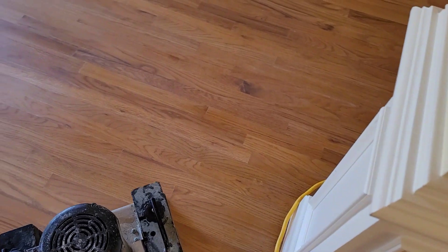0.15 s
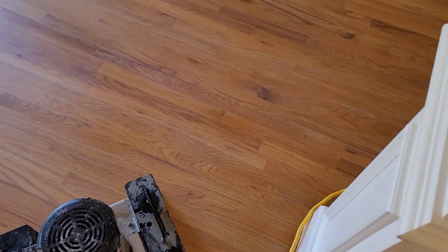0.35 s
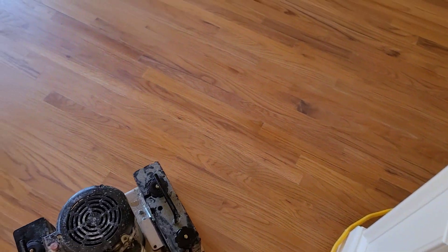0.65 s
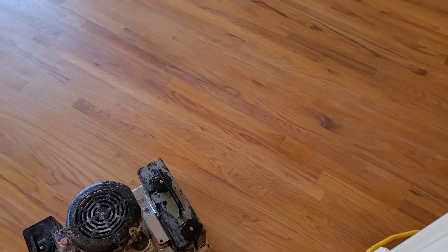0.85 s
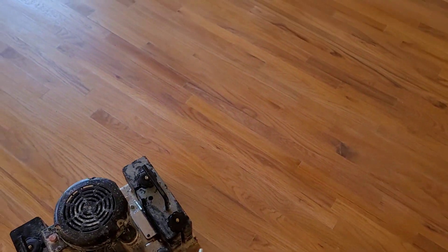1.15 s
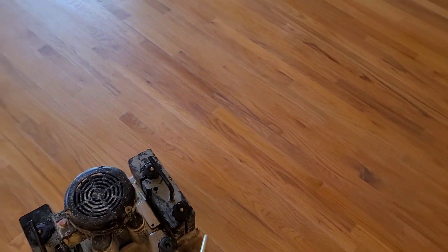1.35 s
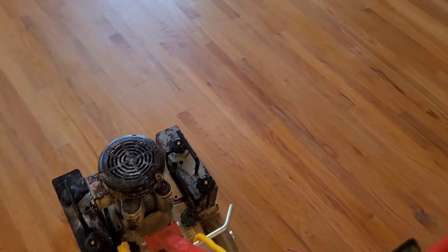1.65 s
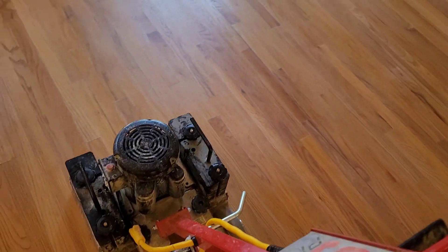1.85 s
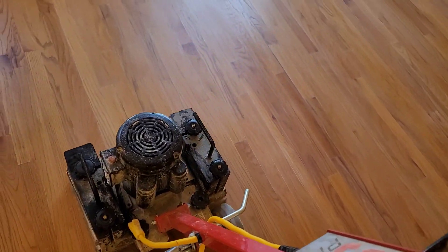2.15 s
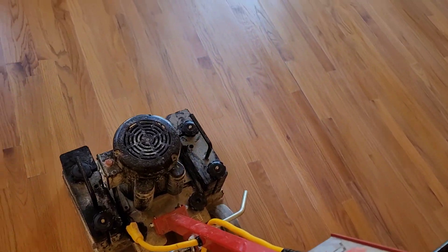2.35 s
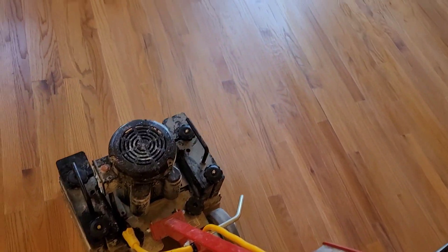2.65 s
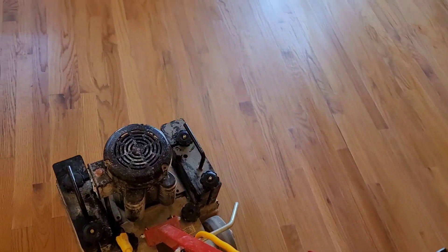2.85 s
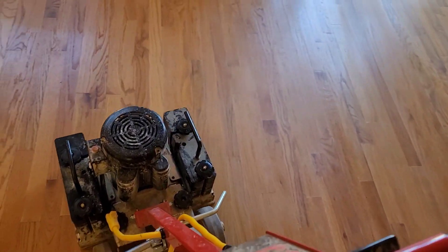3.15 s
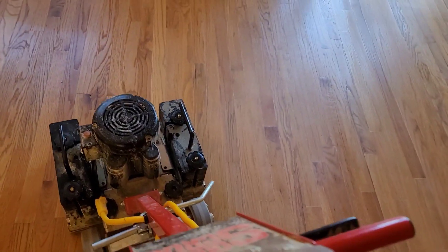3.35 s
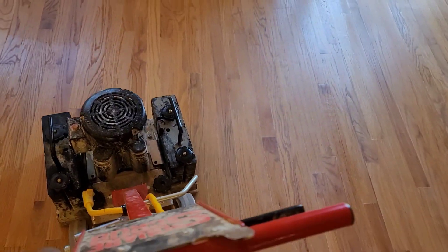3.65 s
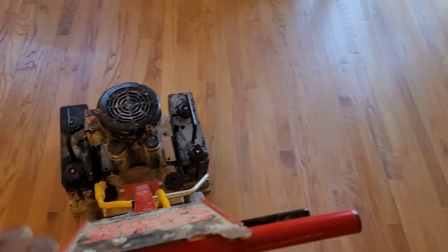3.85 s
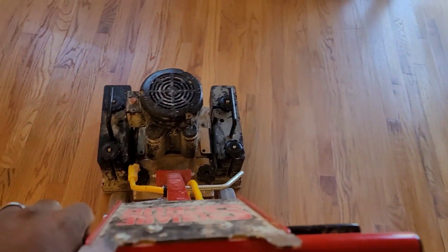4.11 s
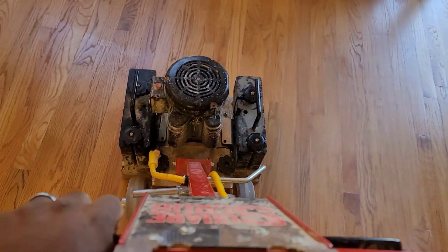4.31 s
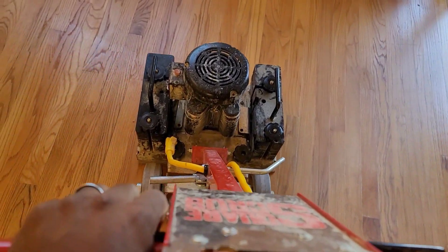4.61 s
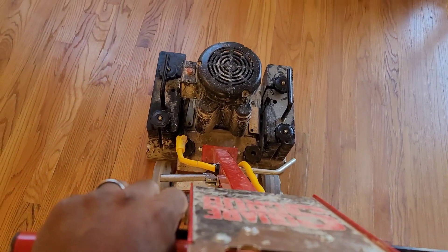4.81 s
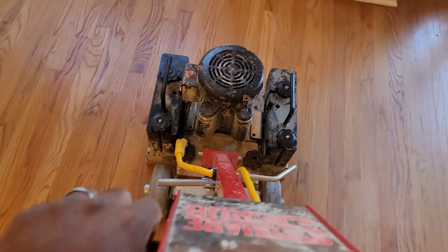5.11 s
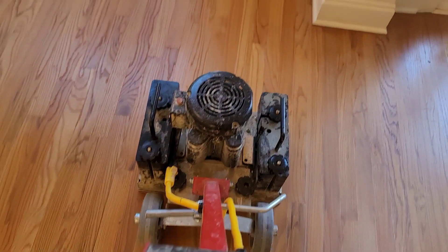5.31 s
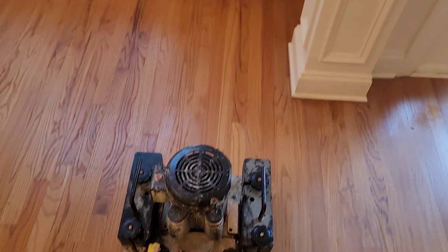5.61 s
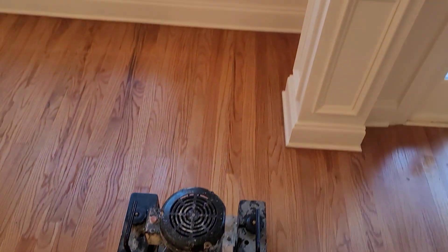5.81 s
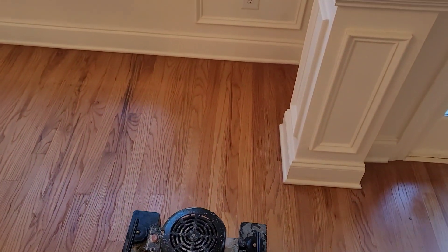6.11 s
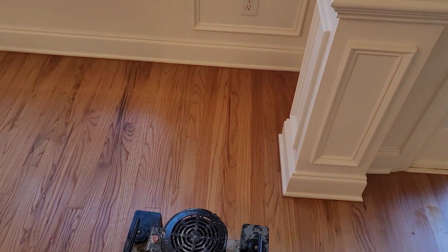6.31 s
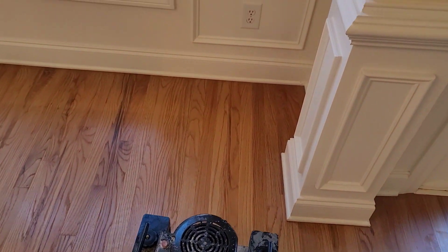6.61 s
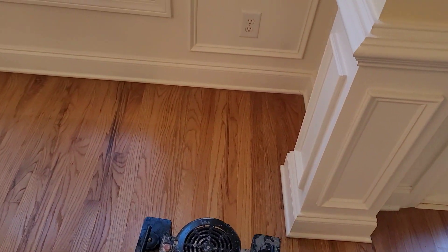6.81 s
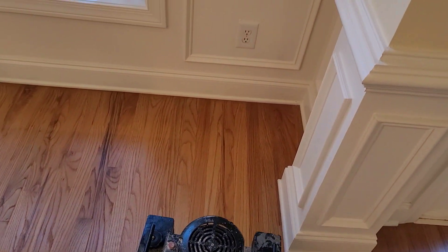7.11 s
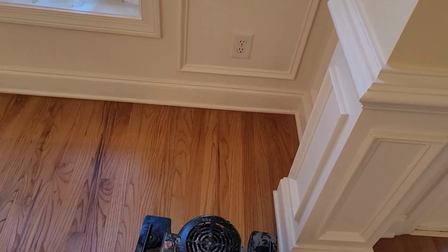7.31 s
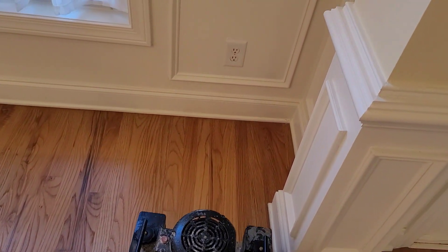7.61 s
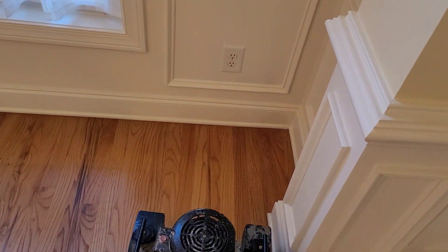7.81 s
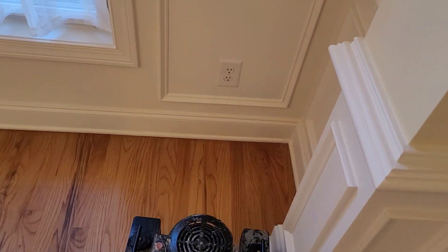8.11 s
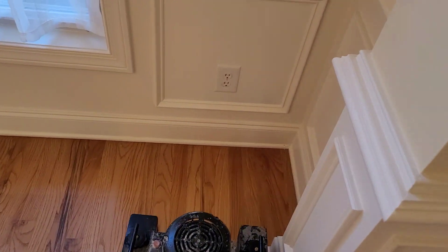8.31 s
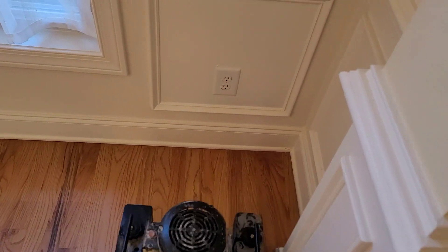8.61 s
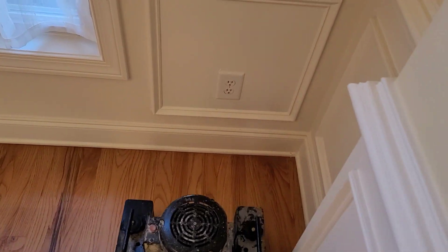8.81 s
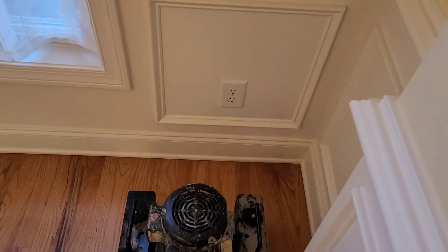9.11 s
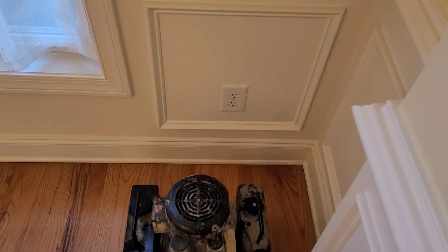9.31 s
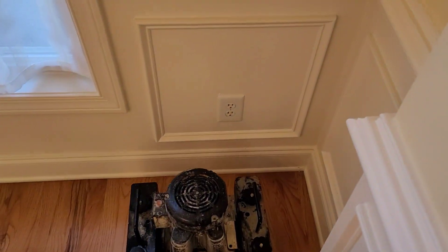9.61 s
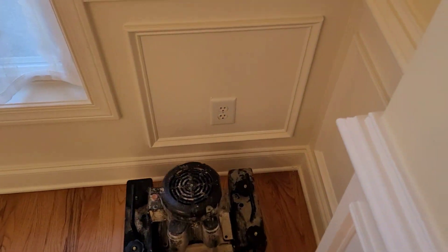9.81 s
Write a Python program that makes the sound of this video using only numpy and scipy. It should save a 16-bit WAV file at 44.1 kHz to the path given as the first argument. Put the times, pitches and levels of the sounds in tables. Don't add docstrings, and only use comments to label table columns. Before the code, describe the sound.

Heard from the handle in close stereo, a scrubbing machine keeps a constant motor drone and strong airy roar while gliding over hardwood. Thin whining tones fade in and out with the room's reflections, and the rubbing pad flickers with soft high hiss. Toward the wall and corner the sound thickens and brightens a little, with small dry scratches of grit; it never stops.

```python
import sys
import numpy as np
from scipy import signal
from scipy.io import wavfile
from scipy.ndimage import uniform_filter1d

SR = 44100
rng = np.random.default_rng(int(sys.argv[2]) if len(sys.argv) > 2 else 0)


def persist_wave(psi):
    counts = np.round(np.clip(psi, -1, 1) * 32767).astype(np.int16)
    wavfile.write(sys.argv[1], SR, np.atleast_2d(counts).T)


def undo_db(level):
    steps = np.asarray(level, float) / 20
    return 10 ** steps


N = 438794
SHAFT_HZ = 58.82


def evened(x):
    return x / np.sqrt(np.mean(abs(x) ** 2) + 1e-20)


def read(points, hz):
    f, *columns = np.transpose(points)
    return [np.interp(np.log(hz + 1), np.log(f + 1), c) for c in columns]


def follow(rows, t):
    s, *columns = np.transpose(rows)
    return [np.interp(t, s, c) for c in columns]


def wander(per_s, t, count):
    white = rng.standard_normal((count, 1024, 2)) @ [1, 1j]
    spectrum = white * np.exp(-(np.fft.fftfreq(1024, .01) / per_s) ** 2)
    slow = evened(np.fft.ifft(spectrum))
    return np.array([np.interp(t, np.arange(1024) / 100, row) for row in slow])


def bumps(rows, t, scale=float):
    return sum(scale(db) * np.exp(-.5 * ((t - s) / max(spread, .01)) ** 2) for s, db, spread in rows)


def crests(tables, t):
    trough_db = -63
    return np.array([undo_db(trough_db) + bumps(rows, t, undo_db) for rows in tables])


# (time [s], fan roar level [dB], first shroud resonance [Hz])
WALK = [(0, -32.5, 1460), (.4, -32, 1450), (.8, -32, 1530), (2.2, -31, 1570), (3.2, -31.5, 1505),
        (4.2, -31, 1504), (5.5, -30.5, 1490), (5.9, -30.5, 1510), (6.6, -30, 1440), (7.0, -30.5, 1520),
        (7.9, -30.5, 1530), (8.25, -28.5, 1530), (8.7, -29.5, 1515), (9.0, -28, 1500), (9.4, -29, 1500),
        (9.7, -28, 1440), (9.95, -28.5, 1430)]


def wall_gain(t):
    db = follow(WALK, t)[0]
    return db - db.mean()


def swells(ranges, echoes, t, hz, per_s):
    centre_hz, share, corner_db, chance_db = np.transpose(ranges)[:, :, None]
    corner_s, corner_rise_s = 9.48, 0.23
    corner = 1 / (1 + np.exp((corner_s - t) / corner_rise_s * 2))
    levels_db = share * wall_gain(t) + corner_db * corner + np.array([bumps(rows, t) for rows in echoes])
    levels_db += chance_db * wander(per_s, t, count=len(ranges)).real
    handover = np.array([np.interp(hz, centre_hz[:, 0], row) for row in np.eye(len(ranges))])
    return handover.T @ levels_db


def grid(size):
    hop = size // 4
    return (np.arange((N + 2 * size) // hop) * hop - size) / SR, np.fft.rfftfreq(size, 1 / SR)


def patches(t, hz, bins, frames):
    white = rng.standard_normal((len(t), len(hz))).T
    return evened(uniform_filter1d(uniform_filter1d(white, bins, 0), frames, 1))


# (frequency [Hz], likeness [0-1], left port's lead [rad])
PORTS = [(59, 1, 0.083), (120, 1, 0.49), (300, 0.65, 0.27), (413, 0.7, 0.59), (527, 0.06, 1.9),
         (660, 0.43, 1.5), (810, 0.17, 1.6), (1530, 0.38, 2.09), (2060, 0.57, 1.45), (2530, 0, 2.4),
         (3260, 0.34, 2.95), (4650, 0.07, 3.3), (7000, 0.07, 5), (10000, .03, 4.5)]
# (frequency [Hz], left minus right [dB])
LEAN = [(60, 3), (140, 0.5), (330, -0.5), (770, 0.5), (1500, -3.5), (2700, -1.5), (4200, -3.5), (5000, 2.5),
        (6000, 6), (7300, 15), (8000, 14.5), (9500, 9), (11500, 5), (13500, 0.5)]
# (frequency [Hz], change of likeness start to end [1])
NEARING = [(800, 0), (1300, -0.3), (1550, -0.36), (2100, .2), (2700, -0.025), (3400, 0.12), (5000, 0.26),
           (7000, 0)]


def port_noise(field_db, hz, size):
    a, b, c, d = rng.standard_normal((field_db.shape[1], len(hz), 4)).T
    shared, separate = a + 1j * b, c + 1j * d
    same, lead = (v[:, None] for v in read(PORTS, hz))
    same = same + read(NEARING, hz)[0][:, None] * np.linspace(-.5, .5, field_db.shape[1])
    same = np.clip(same, 0, 1)
    half_db = read(LEAN, hz)[0][:, None] / 2
    left = shared * undo_db(half_db)
    right = (same * shared * np.exp(-1j * lead) + np.sqrt(1 - same ** 2) * separate) * undo_db(-half_db)
    z = np.array([left, right]) * undo_db(field_db)
    return signal.istft(z, nperseg=size, noverlap=size * 3 // 4)[1][:, size:N + size]


def tone(order, turns, level, drift):
    lead, half_db = read(PORTS, order * SHAFT_HZ)[1], read(LEAN, order * SHAFT_HZ)[0] / 2
    spin = np.sqrt(2) * level * np.exp(2j * np.pi * order * turns)
    left = spin * undo_db(half_db) * (1 + drift)
    right = spin * undo_db(-half_db) * np.exp(-1j * lead) * (1 - drift)
    return np.array([left, right]).real


def facing(order, t, lean_db, lead):
    usual_lead, usual_db = read(PORTS, order * SHAFT_HZ)[1], read(LEAN, order * SHAFT_HZ)[0]
    ratio = undo_db(lean_db - usual_db) * np.exp(1j * (lead - usual_lead))
    return (ratio - 1) / (ratio + 1)


# (time [s], level [dB])
SHAKE = [(0.0, -30), (0.05, -31), (0.16, -28.5), (0.55, -25), (1.02, -24), (1.77, -18), (2.08, -17.5),
         (2.49, -18), (2.74, -16), (4.32, -13), (6.71, -15), (8.2, -11.5), (9.31, -11.5), (9.89, -14),
         (9.95, -13.5)]
# (time [s], peak level [dB], spread [s])
BOARD_CRESTS = [
    [(0, -41, .3), (.9, -33.5, 0.52), (2.1, -29.5, 0.68), (3.5, -36.5, 0.66), (5.2, -35.5, 0.26),
     (6.0, -30.5, 0.45), (7.0, -27, 0.52), (8.3, -28.5, 0.88), (9.9, -39, 0.46)],
    [(.6, -42.5, 0.37), (1.85, -31, 0.445), (2.5, -42.5, 0.27), (3.5, -35, 0.48), (4.7, -39, 0.35),
     (5.5, -42.5, 0.32), (6.9, -30, 0.39), (7.7, -47, 0.22), (8.4, -36, 0.71), (9.7, -41, 0.17)],
    [(.2, -37.5, 0.59), (1.6, -31.5, 0.33), (2.6, -33, 0.42), (4.6, -34, 0.72), (6.9, -33.5, 0.63),
     (8.2, -31.5, 0.48), (9.4, -32, 0.47)],
]
# (time [s], peak level [dB], spread [s])
FRAME_CRESTS = [
    [(.3, -40, 0.18), (1.8, -44, .5), (4.2, -38, 0.68), (5.7, -42, 0.54), (7.2, -42, 0.54),
     (9.7, -38, 0.64)],
    [(1.1, -43, .2), (1.9, -38, 0.17), (3.0, -48, 0.43), (4.5, -42, 0.55), (6.3, -43, 0.8),
     (8.5, -41.5, 0.42), (9.6, -43, .5)],
    [(.7, -38, .55), (2.9, -42.5, 0.74), (5.0, -36.5, 0.45), (7.5, -51, .6), (9.4, -45, .4)],
    [(.4, -37, 0.67), (3.0, -41, 0.54), (4.4, -39.5, 0.59), (5.8, -39.5, 0.4), (7.2, -45, 0.72),
     (9.8, -46, 0.3)],
]
# (time [s], peak level [dB], spread [s])
SIDEBAND_CRESTS = [
    [(.3, -50, 0.49), (3.1, -40.5, .35), (4.4, -42, .35), (7.9, -41.5, 0.26)],
    [(.2, -46, 0.27), (3.65, -43, 0.25), (8.6, -51, .6)],
    [(.7, -48, 0.3), (1.4, -50, .3), (3.5, -39, .2), (3.9, -35, 0.1), (4.25, -39, .15), (5.3, -48, .15),
     (6.5, -42, .45), (9.6, -46, .3)],
    [(1.7, -44, 0.43), (4.1, -43, 0.64), (5.3, -37.5, 0.26), (6.5, -50, 0.42), (7.6, -49, 0.34)],
    [(.1, -39, .2), (2.2, -40, 0.22), (3.7, -40, 0.27), (4.9, -39, 0.26)],
    [(.1, -48, .2), (2.6, -50, .3), (5.0, -45, .3), (6.5, -46, 0.18), (7.4, -49, 0.45), (9.3, -48, .4)],
]
BALL_ORDERS = 3.61, 4, 5.393, 6, 5.607, 8, 9.15, 9.39, 9.78, 13
# (time [s], left minus right [dB], left lead [rad], the same two for order 2 [dB], [rad])
FACING_LOW = [(0.15, 0.5, 0.31, 3.0, 0.09), (0.9, -1.0, 0.31, 1.0, 0.21), (1.7, -1.5, 0.22, -1.5, 0.07),
              (2.5, -1.5, 0.22, -1.5, -0.08), (3.4, -1.0, 0.2, 1.0, -0.06), (4.2, -1.0, 0.24, 1.0, 0.06),
              (5.0, -1.5, 0.29, 2.5, -0.04), (5.9, -1.0, 0.35, 2.0, 0.13), (6.8, -1.0, 0.38, 0.0, 0.22),
              (7.7, -1.0, 0.33, -0.5, 0.34), (8.6, -0.5, 0.28, -2.0, 0.31), (9.7, -0.0, 0.27, -1.0, 0.03)]
# (time [s], left minus right [dB], left lead [rad], the same two for order 5 [dB], [rad])
FACING_HIGH = [(0.15, -1.5, 0.51, -3.0, -0.52), (0.9, -0.5, 0.66, 3.0, -1.09), (1.7, -0.5, 0.41, 3.5, 0.13),
               (2.5, -3.0, 0.47, 2.0, 0.72), (3.4, -4.0, 0.03, -1.5, 0.55), (4.2, -6.0, -0.32, 1.0, 0.2),
               (5.0, -3.5, -0.2, 0.5, -0.02), (5.9, -14.0, 2.26, -1.0, 0.14), (6.8, -0.0, 0.49, -0.0, 0.11),
               (7.7, -2.0, 0.63, 0.5, -0.02), (8.6, -1.5, 0.72, 1.0, 0.19), (9.7, 1.0, 0.49, 1.0, 0.13)]
# (time [s], delay [rad])
SKEW = [(0, -1.35), (1.5, .05), (3, .2), (4, -.25), (5, .7), (6.5, .8), (7.5, 1.15), (9.95, .6)]
# (time [s], advance [rad])
THIRD_SLIDE = [(0, -.9), (.9, 2.3), (1.7, 4.6), (2.1, 5.2), (2.9, 5.8), (3.7, 7.4), (4.1, 7.6), (4.5, 4.5),
               (5.3, 1.4), (5.7, 1.2), (6.1, 3.8), (6.9, 4.1), (7.7, 4.7), (8.5, 6.7), (9.95, 10.9)]


def weight_and_bearings(turns, t):
    levels = [undo_db(follow(SHAKE, t)[0]), *crests(BOARD_CRESTS + FRAME_CRESTS + SIDEBAND_CRESTS, t)]
    orders = (1, 2, 3, 5) + tuple(BALL_ORDERS)
    count = len(orders)
    drifts = 0.053 * (np.array(orders)[:, None] - .7) * wander(0.52, t, count=count)
    angles = np.reshape(follow(FACING_LOW, t) + follow(FACING_HIGH, t), (4, 2, -1))
    drifts[:4] = [facing(k, t, *angle) for k, angle in zip(orders, angles)]
    flutter_share = np.minimum(np.arange(1, count - 1)[:, None] / 3, 1)
    levels[2:] = levels[2:] * (1 + .1 * wander(5, t, count=count - 2) * flutter_share)
    delays = .09 * wander(.12, t, count=count).real
    delays[:3] = follow(SKEW, t)[0] / (2 * np.pi), 0 * t, -follow(THIRD_SLIDE, t)[0] / (6 * np.pi)
    delays[5] = delays[5] / 4 - .064
    return sum(tone(k, turns - d, level, z) for k, level, z, d in zip(orders, levels, drifts, delays))


FAINT_ORDERS = 4.61, 5.22, 6.22, 6.39, 6.61, 7, 7.22, 8.22, 8.39, 8.61, 15.17, 16.18, 18, 22, 28.7, 33, 53.2
FAINT_DB = [-56, -59, -53, -54, -53, -54, -52.5, -60, -74, -52, -51.5, -50, -57, -47.5, -47, -48, -52]


def faint_lines(turns, t):
    fades, drifts = wander(1.4, t, count=len(FAINT_DB)), wander(0.95, t, count=len(FAINT_DB))
    lines = zip(FAINT_ORDERS, FAINT_DB, fades, drifts)
    return sum(tone(k, turns, undo_db(db) * fade, 0.38 * z) for k, db, fade, z in lines)


# (time [s], peak level [dB], spread [s])
CASING_CRESTS = [
    [(1.1, -41, 0.5), (2.6, -37.5, 0.45), (3.3, -51, 0.18), (3.9, -43, .25), (6.3, -47, .25),
     (8.2, -45, .3), (9.3, -38.5, .5)],
    [(1.0, -34.5, 0.42), (2.8, -67, .15), (3.6, -36, 0.19), (6.6, -48, 0.43), (9.3, -38.5, 0.5)],
    [(.5, -38, .3), (2.6, -40, 0.49), (4.0, -39, .4), (4.95, -34, 0.31), (7.4, -48, .2), (9.4, -39, .5)],
    [(.1, -36, .2), (2.4, -53, 0.43), (4.1, -40, 0.55), (5.1, -38, 0.23), (7.0, -49, 0.45), (8.4, -58, 0.6)],
]


def motor_casing(turns, t, rocking):
    casing = crests(CASING_CRESTS, t) * abs(rocking[[0, 0, 1, 1]])
    ninth = casing[:2] * np.cos(2 * np.pi * 9 * turns + [[0], [1.0]])
    tenth = casing[2:] * np.cos(2 * np.pi * 10 * turns + [[0], [-2.0]])
    return np.sqrt(2) * (ninth + tenth)


# (time [s], peak level [dB], spread [s])
FAN_CRESTS = [
    [(.05, -37.5, 0.16), (.7, -48, .3), (1.6, -41, .3), (2.1, -34.5, 0.23), (2.7, -34, 0.18),
     (3.25, -32, 0.25), (3.9, -39, .2), (4.65, -30, 0.19), (5.2, -42, .2), (5.7, -41, 0.2),
     (6.3, -37.5, 0.3), (7.35, -28.5, 0.26), (8.4, -37.5, 0.24), (9.0, -38, 0.14), (9.7, -28, 0.29)],
    [(.3, -37, 0.21), (1.6, -31.5, 0.44), (2.7, -36, 0.25), (3.4, -35.5, 0.24), (4.5, -30.5, 0.34),
     (3.9, -46, 0.24), (5.15, -31.5, 0.12), (5.7, -42, 0.18), (6.4, -36.5, 0.35), (7.3, -32.5, 0.28),
     (8.3, -37, 0.15), (9.7, -31.5, 0.39)],
]
# (time [s], left port's lead [rad])
FAN_LEAD = [(0, .7), (1.3, 0), (1.7, -1.5), (2.1, -2.6), (2.5, -4.6), (2.9, -3.9), (3.7, -4.3), (4.5, -3.8),
            (5.7, -3.5), (6.1, -2.3), (6.5, -3), (7.0, -4.8), (7.7, -4.5), (8.1, -7.4), (8.5, -7),
            (8.9, -4.2), (9.95, -4.7)]


def cooling_fan(turns, t, rocking):
    blades = 11
    lead = follow(FAN_LEAD, t)[0] + 0.15 * wander(0.65, t, count=1)[0].real
    phase = 2 * np.pi * blades * turns + np.outer([.5, -.5], lead)
    return np.sqrt(2) * crests(FAN_CRESTS, t) * abs(rocking) * np.cos(phase)


def shaft_lines(turns, t):
    step = 8
    turns, t = turns[::step], t[::step]
    out = weight_and_bearings(turns, t) + faint_lines(turns, t)
    rocking = 1 + .2 * wander(6, t, count=3)
    out += motor_casing(turns, t, rocking) + cooling_fan(turns, t, rocking[2])
    return signal.resample_poly(out, step, 1, axis=1, padtype="line")[:, :N]


# (frequency [Hz], density [dB per Hz])
BOARD_COLOUR = [(20, -10), (40, 3), (75, 9), (110, 1), (150, 3.5), (250, 7), (350, 8), (450, 1), (550, -5),
                (800, -1)]
# (centre [Hz], share of wall gain [1], lift in the corner [dB], slow chance [dB])
RUMBLE_RANGES = [(160, 1, 2, 2.3), (293, -0.55, 4, -4.5), (430, 0.82, 2, 6)]
# (time [s], change [dB], spread [s])
RUMBLE_ECHOES = [
    [(2.8, 2, .5), (4.3, -0.5, 0.55), (8.5, 0, .3)],
    [(.2, 4.5, 0.25), (2.3, -1, .2), (3.0, 0, .3), (4.8, -2.5, .6), (7.7, -0.5, 0.37), (9.0, 6, .3)],
    [(1.3, -7, .4), (2.2, 11, 0.09), (3.3, 2.5, 0.33), (4.7, 4.5, .4), (6.1, -9, 0.36), (7.5, -2, .3),
     (8.0, 0, 0.27), (9.7, -2, 0.27)],
]


def rumble():
    t, hz = grid(4096)
    colour_db = read(BOARD_COLOUR + [(1500, -78)], hz)[0][:, None]
    field_db = colour_db + swells(RUMBLE_RANGES, RUMBLE_ECHOES, t, hz, 0.84)
    return undo_db(-34.0) * evened(port_noise(field_db + 0.68 * patches(t, hz, 5, 12), hz, size=4096))


# (frequency [Hz], density [dB per Hz])
AIR_COLOUR = [(300, -30), (500, -7.5), (700, -8), (1000, -7.5), (1300, -2.5), (1530, -4), (1750, -7.5),
              (2100, -8.5), (2350, -11.5), (2750, -9), (2950, -11), (3400, -9), (4300, -13), (4800, -13.5),
              (5500, -17), (5800, -16), (6400, -22), (7300, -34.5), (7900, -53), (9000, -51), (12000, -80)]
# (share of the slide [1], offset [Hz], width [Hz], lift [dB], whistle [dB])
SHROUD = [(1, 35, 173, 3, 3.5), (0.305, 1664, 86, 3, 3), (0.2, 2480, 120, -0.5, 2)]
# (centre [Hz], share of wall gain [1], lift in the corner [dB], slow chance [dB])
AIR_RANGES = [(900, 0.77, 0.5, -1.3), (1500, 0.73, -3.5, -1.07), (2050, 0.44, 1.5, -0.9),
              (2730, 1.02, -1, 0.16)]
# (time [s], change [dB], spread [s])
AIR_ECHOES = [
    [(2.1, -1.5, 0.3), (3.3, -2.5, 0.41), (4.5, -3.4, 0.46), (6.6, 0.5, 0.21), (8.35, -3.5, 0.27)],
    [(1.0, 1.5, .3), (1.8, 1, 0.26), (2.4, 1, .3), (3.2, 2.5, 0.18), (3.9, 0.5, 0.19), (4.6, 0.5, .3),
     (5.8, 1, 0.26), (6.75, -0.5, 0.23), (7.4, 2, 0.26), (8.05, -0.5, 0.18), (9.15, 1, 0.16)],
    [(.1, 3, 0.12), (1.8, -1, .4), (4.8, 0, .25), (6.1, -2.5, 0.16), (7.0, -1.5, 0.17), (8.6, 3.5, .2)],
    [(1.25, 0, 0.37), (3.2, .5, .3), (4.2, 0, 0.41), (7.5, 1, 0.14), (8.4, 0, .3)],
]
# (frequency [Hz], width [Hz], time [s], spread [s], change [dB])
GRILLE = [(3130, 50, .9, 1.1, 4.5), (3180, 90, 4.4, 0.55, 0.5), (3140, 50, 4.2, .4, 2),
          (2940, 60, 2.5, 2.5, -1.5), (2620, 82, 1.2, 1.2, 3.5), (3350, 60, 1.3, .6, 1.5),
          (4760, 60, 1.8, 1.8, 4), (1320, 68, .4, 0.45, 1.5), (1280, 60, 6.9, 1.0, -0.5),
          (3780, 97, 5, .4, 3), (3370, 200, 6.3, .6, 1.5), (3570, 280, 8.6, 0.46, 2.5),
          (2790, 60, 9.1, 0.53, 3), (1030, 90, 4.0, 0.43, 2.5), (450, 40, 4.8, .6, 3),
          (1370, 98, 3.0, 1.0, -3), (504, 36, 5.6, 0.25, -4), (715, 70, 4.9, .4, 0),
          (880, 110, 8.1, .25, 3), (870, 160, 1.05, 0.22, 2.5), (2110, 90, 8.8, .4, -4),
          (2100, 90, 2.6, 0.25, 2)]
# (time [s], change [dB], spread [s])
CATCHES = [(.36, -1.5, 0.024), (.84, -2.5, .06), (2.52, -0.5, 0.12), (2.78, 0.5, .06), (3.55, 0, .07),
           (6.32, -1, .1), (6.47, -2, .03), (5.44, -1.5, .03), (3.29, -1, .025), (6.76, 0.5, .1),
           (7.13, 2, 0.044), (8.17, 0, .015), (8.57, 0.5, .06), (9.56, -3.5, 0.036), (9.68, 0, .05)]


def air():
    t, hz = grid(2048)
    peak_hz = follow(WALK, t)[1]
    colour_db = read(AIR_COLOUR, hz)[0][:, None]
    field_db = colour_db + swells(AIR_RANGES, AIR_ECHOES, t, hz, 1.2)
    wavers = wander(1.8, t, count=len(SHROUD)).real
    for (share, offset_hz, width, lift_db, whistle_db), waver in zip(SHROUD, wavers):
        off_hz = hz[:, None] - share * peak_hz - offset_hz
        field_db = field_db + lift_db / (1 + (off_hz / width) ** 2)
        field_db = field_db + whistle_db * np.exp(-((off_hz - 40 * waver) / 32) ** 2)
    for centre_hz, width, s, spread, lift_db in GRILLE:
        resonance = np.exp(-((hz[:, None] - centre_hz) / width) ** 2)
        field_db = field_db + resonance * bumps([(s, lift_db, spread)], t)
    field_db += 0.68 * np.clip(hz[:, None] / 3000 - 1.2, 0, 1) * bumps(CATCHES, t)
    strands = patches(t, hz, 2, 14)
    field_db += 2.0 * strands / (1 + hz[:, None] / 5000) + 0.5 * patches(t, hz, 14, 6)
    return undo_db(-21.5) * evened(port_noise(field_db, hz, size=2048))


# (frequency [Hz], density [dB per Hz])
PAD_COLOUR = [(5000, -28), (7000, -3.5), (7900, -8.5), (8600, -0.5), (9700, -2), (11500, 2.5), (12500, 1),
              (14500, 0.5), (15700, -1.5), (16500, -5)]


def pad(turns, t):
    pad_db, wall_share, grip_db = -42, 1.2, 0.8
    frames, hz = grid(256)
    colour_db = read(PAD_COLOUR, hz)[0][:, None]
    hiss = evened(port_noise(colour_db + 1.0 * patches(frames, hz, 20, 5), hz, size=256))
    level_db = pad_db + wall_share * wall_gain(t) + bumps(CATCHES, t)
    slips = evened(uniform_filter1d(uniform_filter1d(rng.standard_normal(N), 500), 300))
    drag = evened(uniform_filter1d(uniform_filter1d(rng.standard_normal(N), 3500), 2000))
    throb = 1.3 * np.cos(2 * np.pi * turns)
    return undo_db(level_db + grip_db * (throb + 0.76 * slips + 0.94 * drag)) * hiss


# (time [s], peak level [dB], pitch [Hz])
GRIT = [(2.7463, -34, 11000), (3.2066, -32, 12600), (4.3096, -36, 10670), (4.8399, -34, 12700),
        (5.024, -35, 10900), (5.1622, -35, 11600), (5.3991, -33, 13500), (7.9144, -29, 14830),
        (8.0606, -33, 11370), (8.1723, -30, 11400), (8.301, -31, 13100), (8.5131, -32, 14500),
        (8.6134, -25.5, 14800), (8.7515, -26.5, 11400), (8.9201, -25, 11700), (9.0738, -28, 14400),
        (9.139, -27, 14400), (9.1726, -26, 15000), (9.2085, -28, 10800), (9.3766, -28, 11380),
        (9.414, -29, 10200), (9.9223, -30, 14330)]


def grit():
    out, u = np.zeros((2, N)), np.arange(400) / SR
    shape = u / 0.0014 * np.exp(1 - u / 0.0019)
    for (s, db, hz), noise in zip(GRIT, rng.standard_normal((len(GRIT), 2, 400))):
        scratch = evened(uniform_filter1d(noise, 14) * np.cos(2 * np.pi * hz * u))
        at = round(s * SR)
        out[:, at:at + 400] += undo_db(db - 9.0 + np.array([[1.2], [-1.2]])) * shape * scratch
    return out


def scene():
    t = np.arange(N) / SR
    turns = SHAFT_HZ * t
    return shaft_lines(turns, t) + rumble() + air() + pad(turns, t) + grit()


def roll_off(x):
    return signal.sosfilt(signal.butter(12, 15800, fs=SR, output="sos"), x)


def record(dry):
    hz, t, z = signal.stft(dry, SR, nperseg=2048, noverlap=1024)
    bands = z[:, 256:512].reshape(2, 32, 8, -1)
    band_db = 10 * np.log10((abs(bands) ** 2).mean(2, keepdims=True) + 1e-20)
    floor_db = np.reshape([-74.5, -80.0], (2, 1, 1, 1))
    z[:, 256:512] = (bands * np.where(band_db < floor_db, .03, 1)).reshape(2, 256, -1)
    kept = signal.istft(z, SR, nperseg=2048, noverlap=1024)[1][:, :N]
    return roll_off(kept)


dry = scene()
out = record(dry)
persist_wave(out)
```